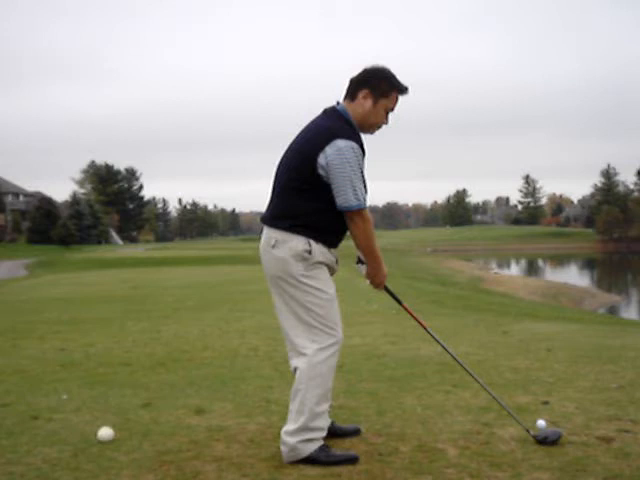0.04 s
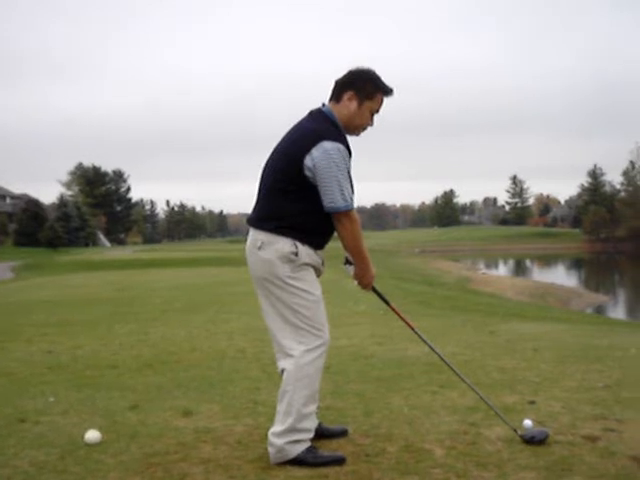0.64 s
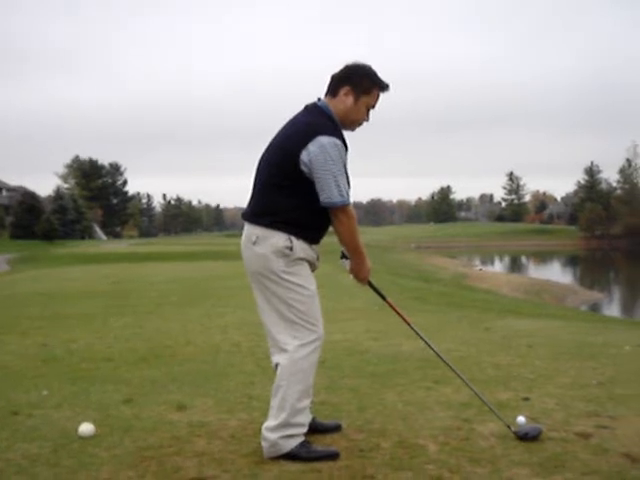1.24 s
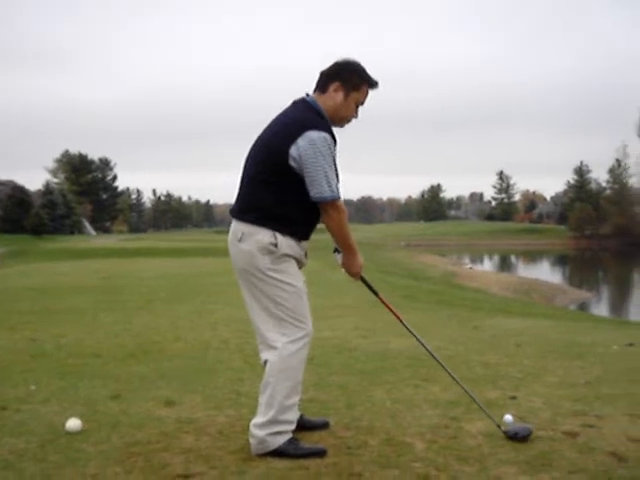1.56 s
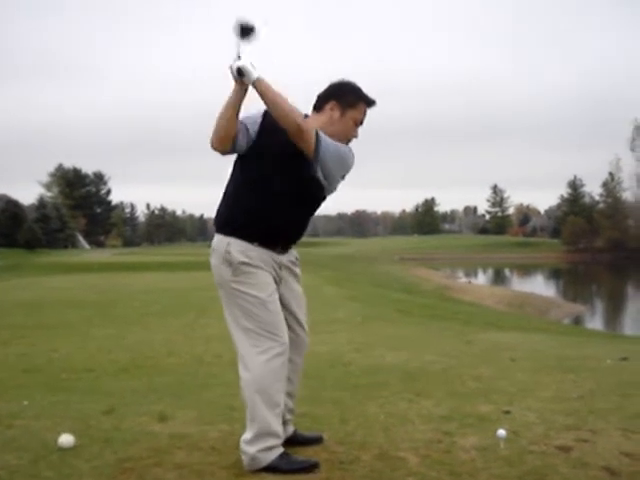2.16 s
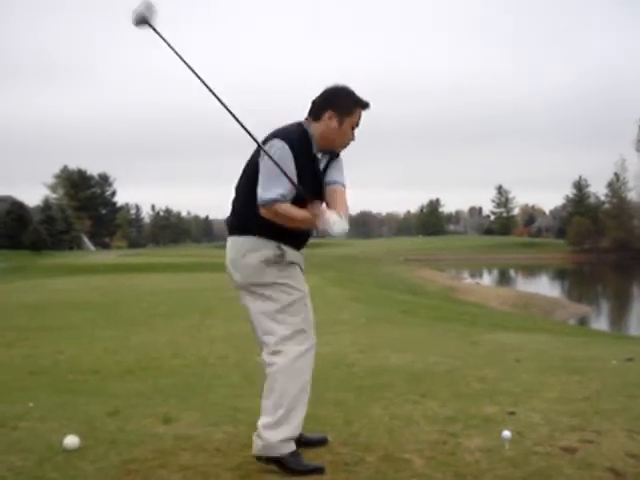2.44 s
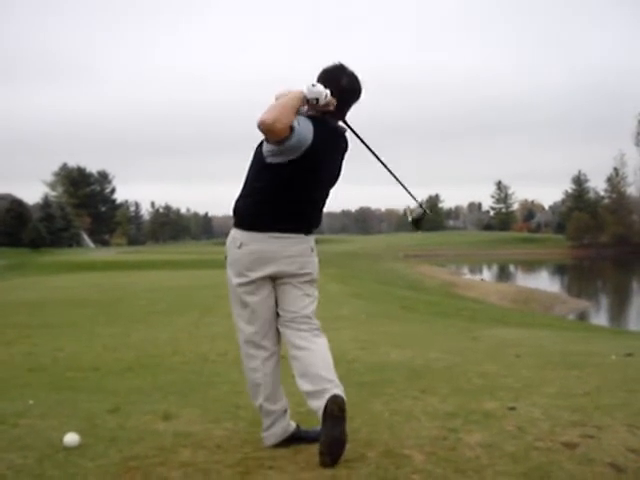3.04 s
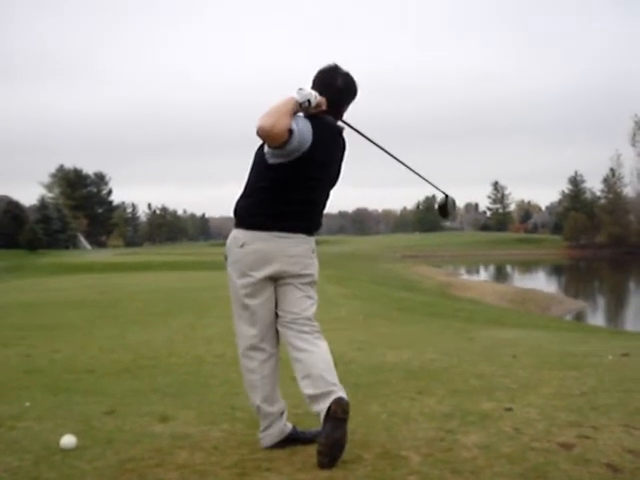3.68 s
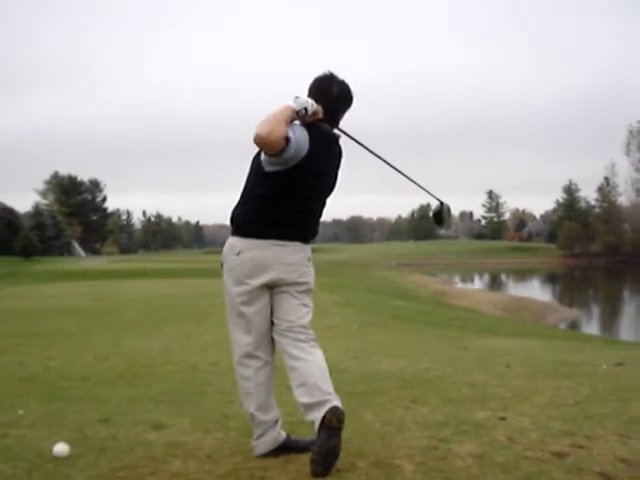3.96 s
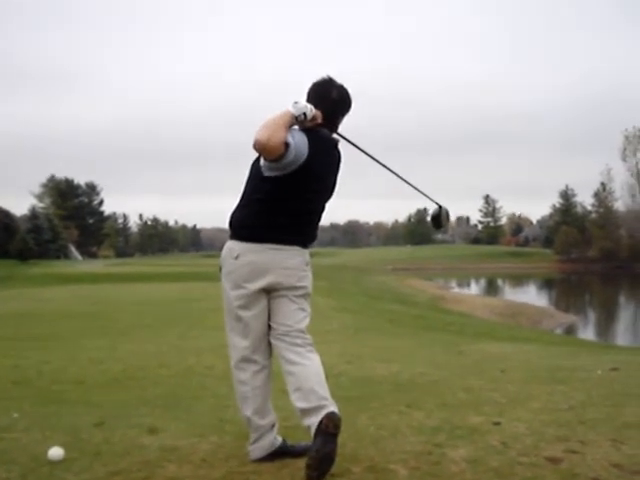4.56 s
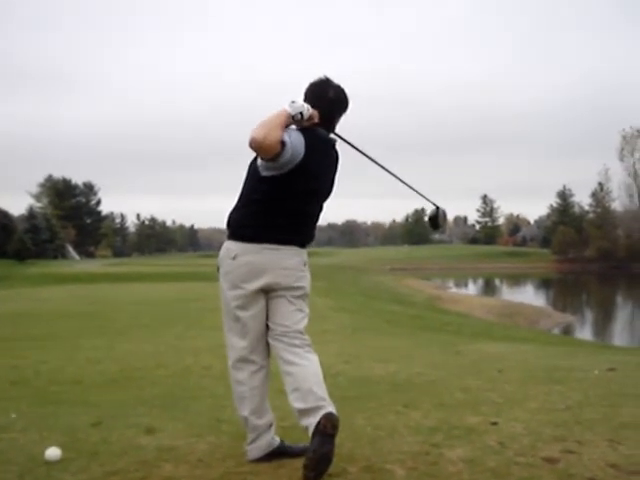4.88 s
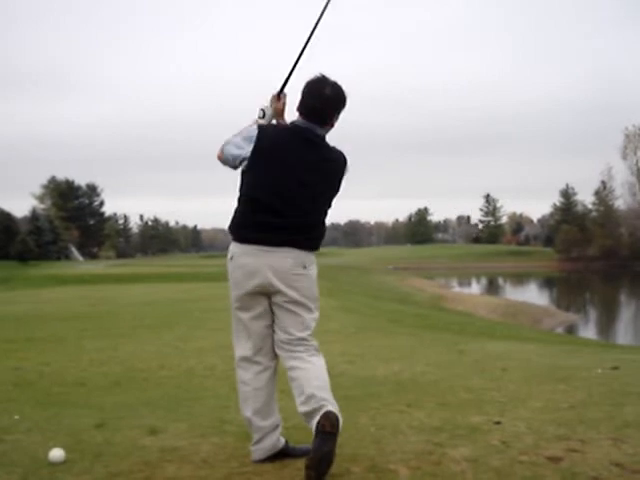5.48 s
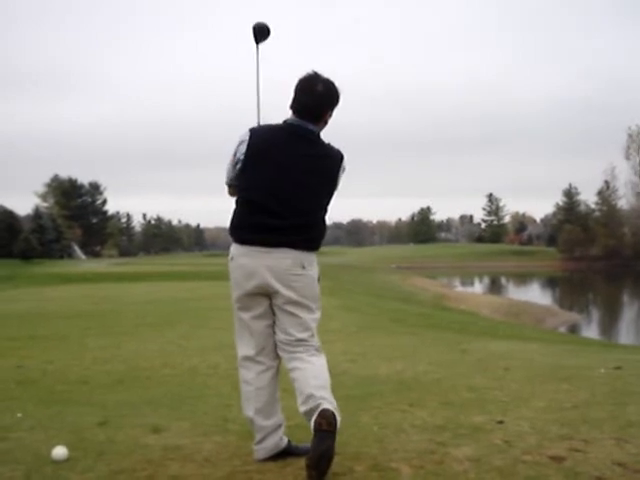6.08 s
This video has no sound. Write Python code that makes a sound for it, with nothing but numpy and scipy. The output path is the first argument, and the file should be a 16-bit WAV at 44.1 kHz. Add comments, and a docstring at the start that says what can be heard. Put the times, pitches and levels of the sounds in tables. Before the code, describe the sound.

A golf driver swishes and hits a ball with a sharp metallic crack that echoes off trees, over faint wind and distant traffic.

```python
"""A golf tee beside a pond: on the drive the shaft swishes, the face cracks and the hollow metal head rings.
The head flies away from the listener and toward the trees, so their echoes come back higher in pitch,
and the woods ring on. Far traffic and wind murmur, with two bird chirps and a faint rising squeak.
A sleeve rustles and leather squeaks. Close by, a camera adds small knocks and its thin whine and ticks."""
import sys
import numpy as np
from scipy import signal
from scipy.fft import rfft, irfft
from scipy.io import wavfile

SR = 44100
rng = np.random.default_rng(int(sys.argv[2]) if len(sys.argv) > 2 else 0)


def store_pcm(level_fs):
    """Save levels as 16-bit WAV."""
    pcm = np.round(np.clip(level_fs, -1, 1) * 32767).astype(np.int16)
    wavfile.write(sys.argv[1], SR, np.atleast_2d(pcm).T)


N = 278712
TIME = np.arange(N) / SR
SHORT = TIME[:SR // 5]  # 0.2 s time base for one-shots
IMPACT_S, CUTOFF_HZ = 2.6411, 10050


def from_db(db):
    """Decibels to gain."""
    return 10 ** (np.asarray(db) / 20)


def rms_one(x):
    """Normalise to rms 1."""
    return x / np.sqrt(np.mean(x ** 2) + 1e-20)


def noise(colour, size=N):
    """Noise shaped by an EQ curve, rms 1."""
    hz, db = np.transpose(colour)
    bins = np.maximum(np.fft.rfftfreq(size, 1 / SR), 1)
    gain = from_db(np.interp(np.log(bins), np.log(hz), db))
    return rms_one(irfft(rfft(rng.standard_normal(size)) * gain, size))


def drift(rate_hz):
    """Random modulator: glides between values of spread 1."""
    knots = rng.standard_normal(4096)
    return np.interp(TIME * rate_hz, np.arange(len(knots)), knots)


def lowpass(x, hz):
    """Roll off the top at 12 dB per octave."""
    return signal.sosfilt(signal.butter(2, min(hz, .45 * SR), fs=SR, output="sos"), x)


def highpass(x, hz):
    """Roll off the lows at 12 dB per octave."""
    return signal.sosfilt(signal.butter(2, hz, "high", fs=SR, output="sos"), x)


def dying(t60):
    """One-shot envelope that falls 60 dB in t60 seconds."""
    return np.exp(-np.log(1000) * SHORT / t60)


def swell(s, width_s):
    """Bell-shaped envelope, peaking at 1 at time s."""
    return np.exp(-.5 * ((TIME - s) / width_s) ** 2)


def held(s, hold_s, rise_db_per_s, fall_db_per_s):
    """Attack up to time s, hold at 1, release."""
    attack_db = -rise_db_per_s * np.maximum(s - TIME, 0)
    release_db = -fall_db_per_s * np.maximum(TIME - s - hold_s, 0)
    return from_db(attack_db + release_db)


def add(out, s, sound):
    """Mix a sound in at time s."""
    at = round(s * SR)
    out[at:at + len(sound)] += sound[:N - at]


def scatter(x, t60, wet_db):
    """Rough ground or foliage follows a sound with a short spray of reflections."""
    spray = rng.standard_normal(len(SHORT)) * dying(t60)
    return x + from_db(wet_db) * signal.fftconvolve(x, spray / np.linalg.norm(spray))[:len(x)]


def wind():
    """A steady bed of light wind and hiss."""
    # colour of the moving air: (frequency [Hz], level [dB])
    air_colour = [(25, -15), (50, -17.5), (100, -2), (160, -0.5), (230, 0.5), (330, -3), (600, 3.5),
                  (1500, -11.5), (3000, -17), (6000, -21), (10000, -24)]
    return from_db(-49.5) * noise(air_colour)


def far_road(roar_floor_db=-50, tyre_floor_db=-51.5):
    """Distant traffic swells and sinks but never falls silent, wavering on its way here."""
    # colour of the traffic's roar: (frequency [Hz], level [dB])
    roar_colour = [(200, -36), (380, -16), (500, -12.5), (680, -1), (870, 3.5), (1050, 0), (1300, -10),
                   (2000, -39)]
    # colour of the tyre hiss: (frequency [Hz], level [dB])
    tyre_colour = [(700, -19), (1100, 0.5), (1350, 0.5), (1750, -1.5), (2250, -10), (3000, -15),
                   (4300, -23), (5500, -30.5), (8000, -53.5)]
    # traffic swells: (time [s], half width [s], roar level [dB], tyre level [dB])
    swells = [(.25, 0.21, -49.5, -51.5), (.66, 0.18, -46, -68), (1.18, .1, -49.5, -60),
              (2.04, 0.14, -50, -52), (3.17, 0.25, -48, -65), (4.1, 0.48, -49, -56.5),
              (4.8, 0.32, -42, -52.5), (5.62, 0.41, -42.5, -46), (6.3, 0.21, -50, -66)]
    roar_power, tyre_power = from_db(roar_floor_db) ** 2, from_db(tyre_floor_db) ** 2
    for s, width_s, roar_db, tyre_db in swells:
        roar_power += (from_db(roar_db) * swell(s, width_s)) ** 2
        tyre_power += (from_db(tyre_db) * swell(s, width_s)) ** 2
    road = noise(roar_colour) * np.sqrt(roar_power) + noise(tyre_colour) * np.sqrt(tyre_power)
    return road * from_db(.5 * drift(16))


def chirps():
    """Thin, wavering glides: two far bird chirps and a faint rising squeak."""
    # glides: (time [s], length [s], start pitch [Hz], end pitch [Hz], level [dB])
    glides = [(1.361, 0.063, 7560, 7150, -55), (4.26, 0.075, 7300, 8700, -57),
              (5.544, .135, 2650, 5660, -58.5)]
    out = np.zeros(N)
    for s, length_s, start_hz, end_hz, db in glides:
        size = int(length_s * SR)
        hz = np.linspace(start_hz, end_hz, size) + 290 * drift(900)[:size]
        add(out, s, from_db(db + 3) * np.hanning(size) * np.sin(2 * np.pi * np.cumsum(hz) / SR))
    return out


def camera(whine_hz=9035, buzz_hz=8018, frame_hz=29.97):
    """Electronics whine and tick; a clock tone buzzes as it restarts with every frame."""
    # ticks, each stepping the whine's pitch: (time [s], level [dB], new pitch [Hz])
    steps = [(0.8, -42, 9180), (3.268, -39.5, 9060), (4.535, -42, 9180), (5.953, -40.5, 9240),
             (6.208, -42, 9070)]
    tick_colour = [(2000, -14), (5000, 4), (9500, -2)]  # (frequency [Hz], level [dB]), as is the next
    hiss_colour = [(8500, -29), (8950, -2), (9250, 1.5), (9520, .5), (9800, -35)]
    ticks, hz = np.zeros(N), np.full(N, whine_hz)
    for s, db, new_hz in steps:
        hz = np.where(TIME < s, hz, new_hz)
        add(ticks, s, from_db(db) * noise(tick_colour, len(SHORT)) * dying(.015))
    unsteady_hz = hz + 22 * drift(25) + 55 * drift(500)
    whine = from_db(-57.5) * np.sin(2 * np.pi * np.cumsum(unsteady_hz) / SR)
    hiss = from_db(-69) * noise(hiss_colour)
    buzz = from_db(-63.5) * np.sin(2 * np.pi * buzz_hz * (TIME % (1 / frame_hz)))
    return ticks + whine + hiss + buzz


def knocks():
    """Short, dry knocks close by."""
    # hits: (time [s], level [dB])
    hits = [(0.153, -20.5), (1.541, -38)]
    # colour of a knock: (frequency [Hz], level [dB])
    knock_colour = [(50, -35), (150, -15), (350, 4.5), (600, -12), (1200, -1), (2000, -4), (2700, -13),
                    (4200, -12.5), (5000, -29), (9000, -37), (12000, -65)]
    out = np.zeros(N)
    for s, db in hits:
        add(out, s, from_db(db) * noise(knock_colour, len(SHORT)) * dying(.016))
    return out


def sleeve():
    """Cloth brushes in brief, grainy rustles."""
    # rustles: (time [s], length [s], level [dB])
    rustles = [(1.525, 0.028, -57.5), (5.213, 0.033, -52)]
    # colour of the cloth: (frequency [Hz], level [dB])
    cloth_colour = [(1000, -32), (2500, 2), (4000, 2), (6000, 2), (8500, -3), (10000, -24)]
    out = np.zeros(N)
    for s, length_s, db in rustles:
        size = int(length_s * SR)
        grain_db = 8.1 * drift(245)[:size]
        add(out, s, from_db(db + grain_db) * np.hanning(size) * noise(cloth_colour, size))
    return out


def squeak(s=5.229, hold_s=.012, pitch_hz=948, sag_hz_per_s=2400):
    """A leather shoe or glove sticks and slips as the golfer unwinds, sagging in pitch as it lets go."""
    # harmonics of the squeak, from the first up: (level [dB])
    partials_db = [3, -1.5, -12, -13, -10, -12, -8, -22]
    hz = pitch_hz - sag_hz_per_s * np.clip(TIME - s - hold_s, 0, .1)
    phase = 2 * np.pi * np.cumsum(hz * (1 + .013 * drift(900))) / SR
    tone = sum(from_db(db) * np.sin(k * phase) for k, db in enumerate(partials_db, 1))
    return from_db(-39) * rms_one(tone) * held(s, hold_s, rise_db_per_s=2500, fall_db_per_s=480)


def woods(delay_s=.155, tail_t60_s=2.4, edge_db_per_s=1197):
    """Countless trunks and branches spray the strike back unevenly: near stands, then a long tail."""
    # returns from stands of trees, longer for deeper stands: (time [s], length [s], level [dB])
    stands = [(2.7, 0.059, -49.5), (2.8, 0.057, -48.5), (2.888, .068, -46.5)]
    # colour of the spray: (frequency [Hz], level [dB])
    spray_colour = [(500, -8), (1200, -8), (2550, 9.5), (3300, 2), (4150, 14.5), (4700, -9), (5600, -1),
                    (6150, 12), (7200, -17), (8200, -10), (9800, -13)]
    near = sum(from_db(db) * held(s, hold_s, edge_db_per_s, edge_db_per_s) for s, hold_s, db in stands)
    tail = from_db(-49.5) * held(IMPACT_S + delay_s, 0, edge_db_per_s, 60 / tail_t60_s)
    spray = lowpass(noise(spray_colour), CUTOFF_HZ)
    return spray * np.hypot(near, tail) * from_db(2.1 * drift(240))


def echoes(ring, hit, head_mach=.078):
    """Banks and trees throw the strike back, pitched up by the head's speed and smeared by foliage."""
    # reflections: (time [s], hit level [dB], ring level [dB], head's path to reflector [cosine])
    reflections = [(2.706, -28, -34.5, 0.37), (2.7962, -22.5, -31.5, 0.92), (2.812, -38, -33, 0.98),
                   (2.836, -28, -32, -0.083), (2.8554, -22, -47, -0.19), (2.8832, -21.5, -23, 0.19),
                   (2.911, -32, -31, 0.48), (2.926, -31, -34, .5), (2.939, -25, -40, 0.44),
                   (3.0307, -35, -38.5, .65), (3.0659, -23, -37, 0.72), (3.2013, -29, -42, .65),
                   (3.218, -28, -48, .65), (3.436, -33, -38, 0.63)]
    out = np.zeros(N)
    dull_hit = lowpass(hit, 4600)  # foliage softens the crack
    for s, hit_db, ring_db, toward in reflections:
        # trunks and leaves return little bass
        thrown = highpass(from_db(ring_db) * ring + from_db(hit_db) * dull_hit, 1200)
        oversampled = signal.resample_poly(thrown, 4, 1)
        doppler = (1 + head_mach) / (1 - head_mach * toward)
        shifted = np.interp(SHORT * doppler, np.linspace(0, SHORT[-1], len(oversampled)), oversampled)
        smeared = scatter(shifted, t60=.022, wet_db=0)
        air_cutoff_hz = 3900 / np.sqrt(s - IMPACT_S)  # longer paths come back darker
        add(out, s, lowpass(smeared, air_cutoff_hz))
    return out


def swish():
    """Eddies shed by shaft and head: a soft rush over the whole arc, a loud whip at the bottom."""
    # colour of the rushing air: (frequency [Hz], level [dB])
    rush_colour = [(50, -35), (100, -23), (160, -14.5), (290, -8), (400, -4), (520, -8), (780, 3),
                   (1000, -5), (1200, -11), (1500, -9.5), (2000, -21), (3000, -22), (5500, -26),
                   (10000, -32), (13000, -73)]
    arc = from_db(-41.5) * swell(2.64, width_s=.097)
    whip = from_db(-23.5) * held(2.586, hold_s=.05, rise_db_per_s=760, fall_db_per_s=1100)
    return noise(rush_colour) * np.hypot(whip, arc)


def head_ring(flutter=.0092, turn_s=.041, turn_steepness=9.2):
    """The shell's modes swell as the face swings round, flutter with the shaft, fade as it turns away."""
    # strong modes of the hollow head: (frequency [Hz], level [dB], t60 [s], attack [s])
    shell_modes = [(3470, -24, .2, .005), (3806, -7, .3, .012), (3915, -23, .25, .006),
                   (4350, -30, .12, .002), (5275, -26, .15, .002), (5390, -14.5, .23, .006),
                   (5530, -20, .2, .004), (5670, -22, .2, .004), (5772, -22, .25, .005),
                   (5870, -23, .25, .005), (6304, -26, .07, .001), (6896, -26, .07, .001),
                   (8054, -26, .1, .001), (8267, -23, .25, .002), (8374, -20, .25, .002),
                   (9156, -17, .09, .001), (9442, -27, .25, .002)]
    # colour of the crowd of weaker modes round them: (frequency [Hz], level [dB])
    clank_colour = [(500, -70), (2000, -30), (2600, -31), (3300, -16), (3480, -1), (3980, 2), (4200, -15),
                    (4850, -20), (5150, 0), (5900, 2), (6150, -10), (7600, -18), (8250, 0), (9400, -4),
                    (10000, -25)]
    ring = np.zeros(len(SHORT))
    for k, (hz, db, t60, attack_s) in enumerate(shell_modes):
        phase = 2 * np.pi * hz * np.cumsum(1 + flutter * drift(300)[:len(SHORT)]) / SR
        envelope = dying(t60) * (1 - np.exp(-SHORT / attack_s)) ** 2
        ring += from_db(db) * envelope * np.sin(phase) * (-1) ** k
    clank = from_db(-14.5) * noise(clank_colour, len(SHORT)) * dying(.24)
    on_turf = scatter(ring + clank, t60=.02, wet_db=-14)
    return on_turf / (1 + (SHORT / turn_s) ** turn_steepness)


def contact(pulse_width_s=.00015, crack_attack_s=.0008):
    """The squashed ball sends out one pressure pulse, a bright crack and a dull thud."""
    # colour of the crack: (frequency [Hz], level [dB])
    crack_colour = [(2000, -22), (2900, -16), (3600, -8), (5300, -2), (6200, -11), (7000, -9), (7500, 1),
                    (8100, 0), (8800, -9), (9800, 4), (10500, -10), (12000, -40)]
    # colour of the thud: (frequency [Hz], level [dB])
    thud_colour = [(30, -4.5), (100, -10), (350, -9), (1000, 0), (1600, -9), (2500, -16), (5000, -28)]
    from_centre = (SHORT - 2 * pulse_width_s) / pulse_width_s
    pulse = from_db(-2) * from_centre * np.exp(-from_centre ** 2 / 2)
    crack_envelope = dying(.012) * (1 - np.exp(-SHORT / crack_attack_s))
    crack = from_db(3.5) * noise(crack_colour, len(SHORT)) * crack_envelope
    thud = from_db(-11.5) * noise(thud_colour, len(SHORT)) * dying(.027)
    return pulse + crack + thud


def drive():
    """Club meets ball: the direct hit and metal ring, followed by their echoes."""
    ring, hit = head_ring(), contact()
    out = echoes(ring, hit)
    add(out, IMPACT_S, ring + hit)
    return out


def scene():
    """Mono mix of the shot, the outdoor bed and the close details."""
    shot = drive() + woods() + swish()
    bed = far_road() + wind() + chirps()
    details = knocks() + sleeve() + squeak() + camera()
    return (shot + bed + details)[None]


def record(dry, open_s=.078, ceiling=.7, low_cut_hz=55):
    """A small microphone opens after a moment, overloads on the crack, and loses deep bass and top end."""
    saturated = ceiling * np.tanh(dry * (TIME > open_s) / ceiling)
    steep_top_cut = signal.ellip(10, .2, 44, CUTOFF_HZ, fs=SR, output="sos")
    return signal.sosfilt(steep_top_cut, highpass(saturated, low_cut_hz))


dry = scene()
out = record(dry)
store_pcm(out)
```